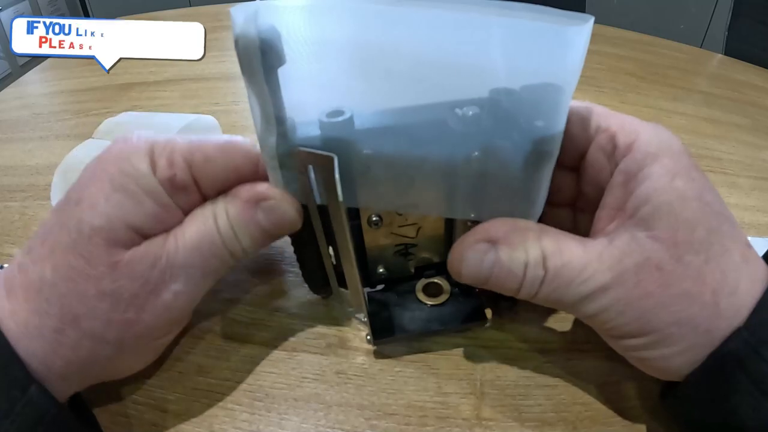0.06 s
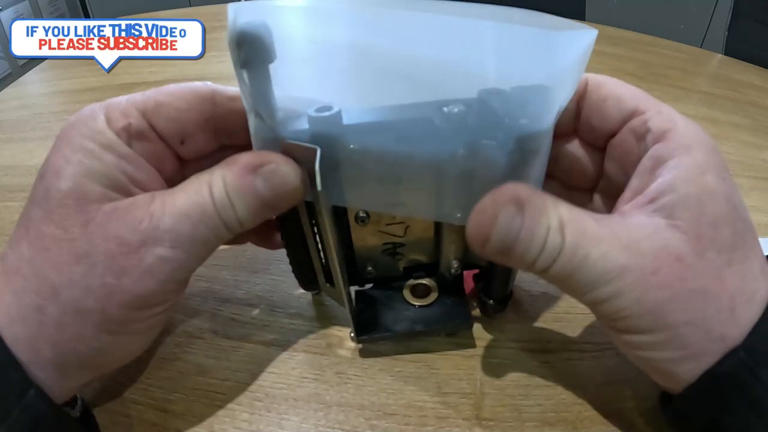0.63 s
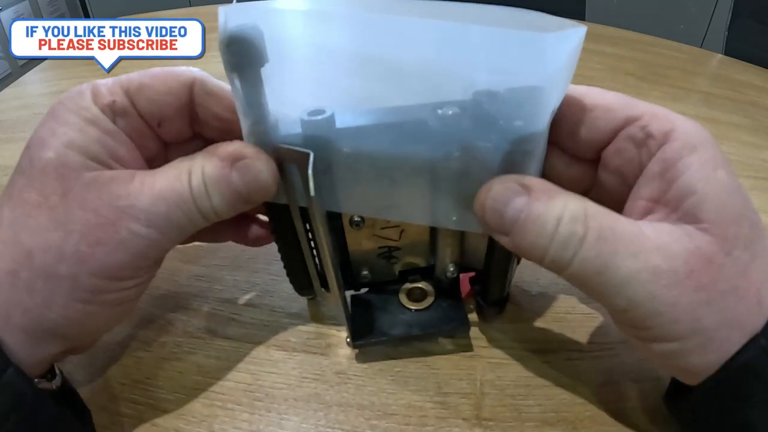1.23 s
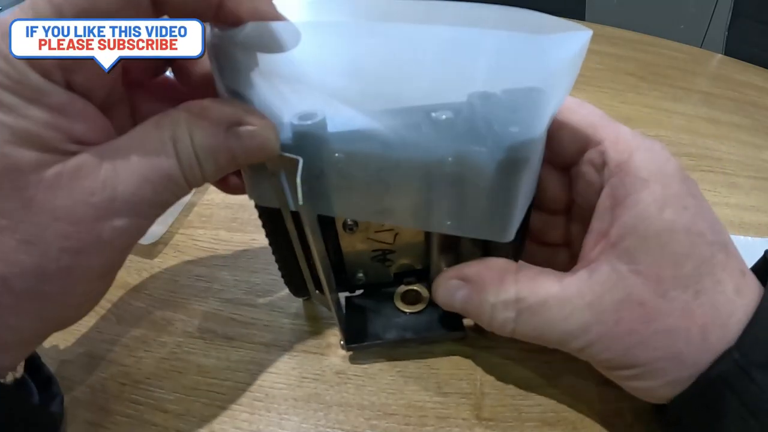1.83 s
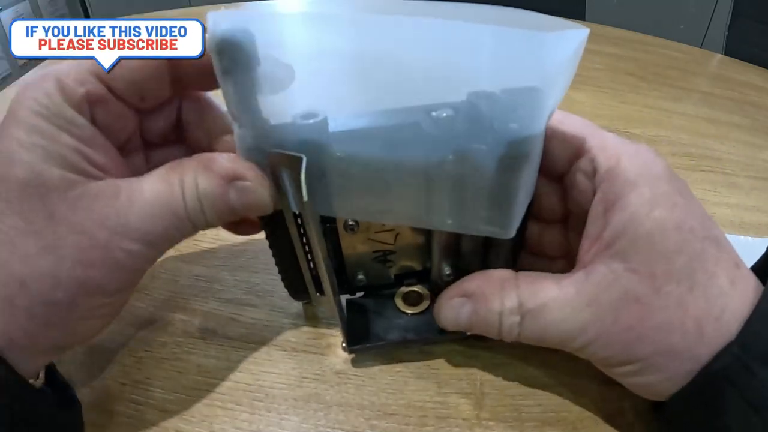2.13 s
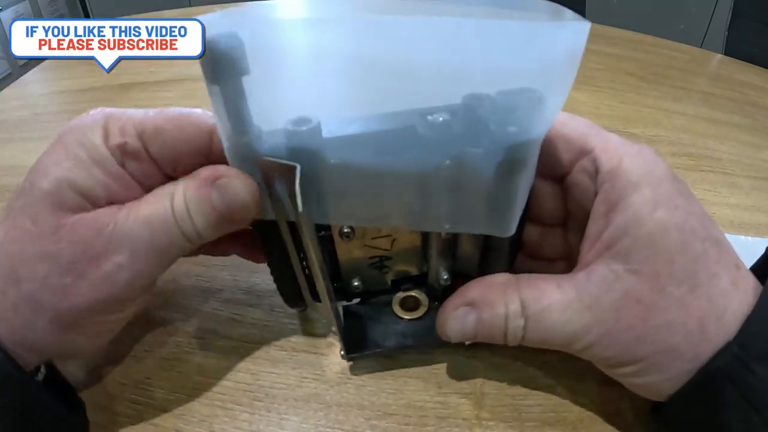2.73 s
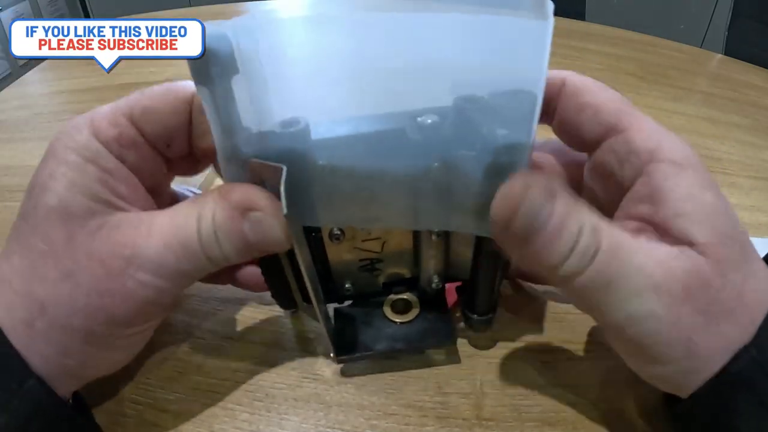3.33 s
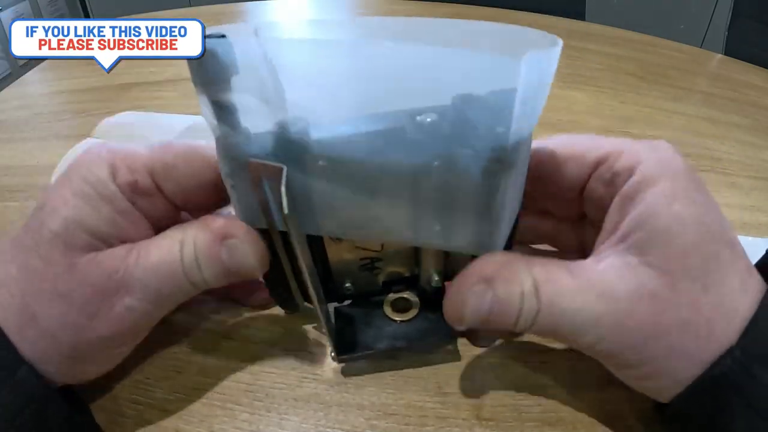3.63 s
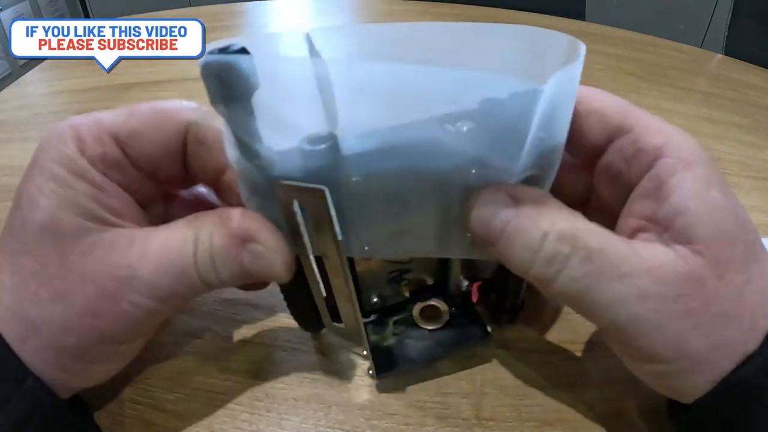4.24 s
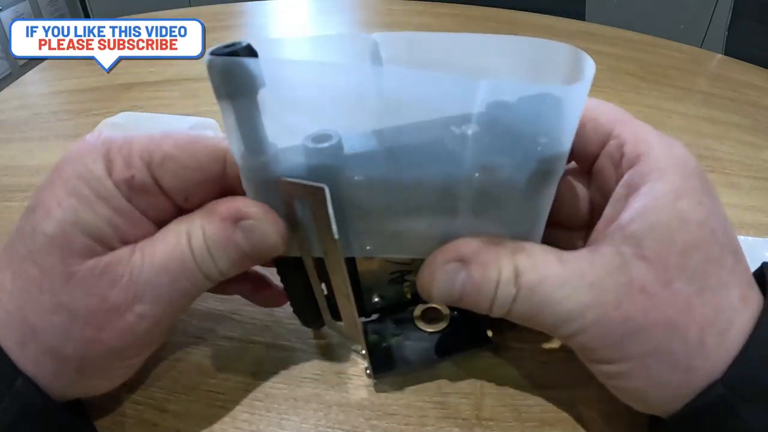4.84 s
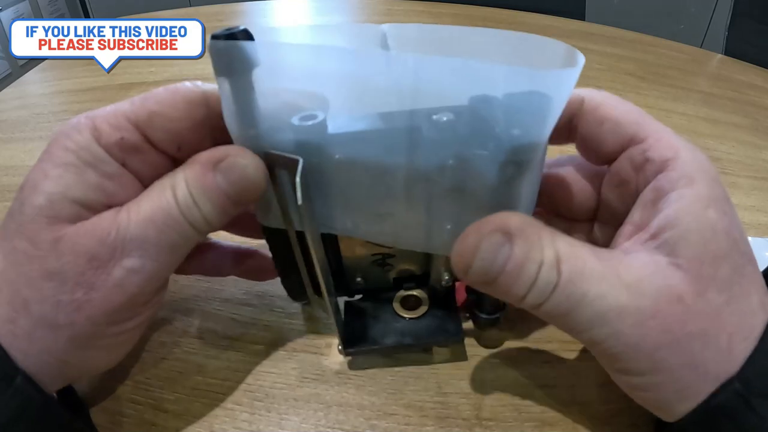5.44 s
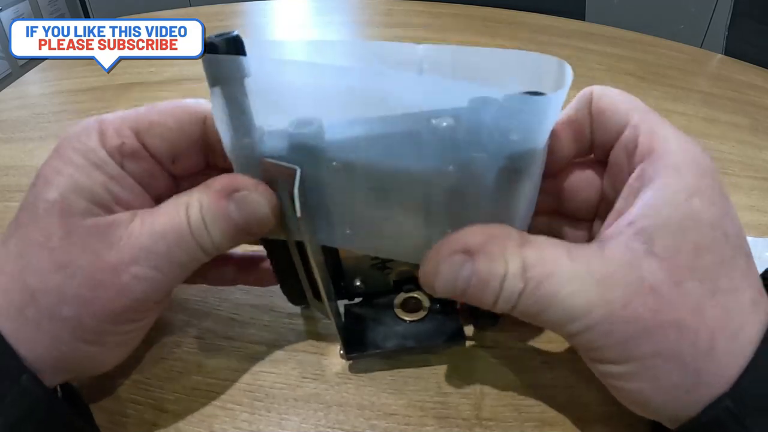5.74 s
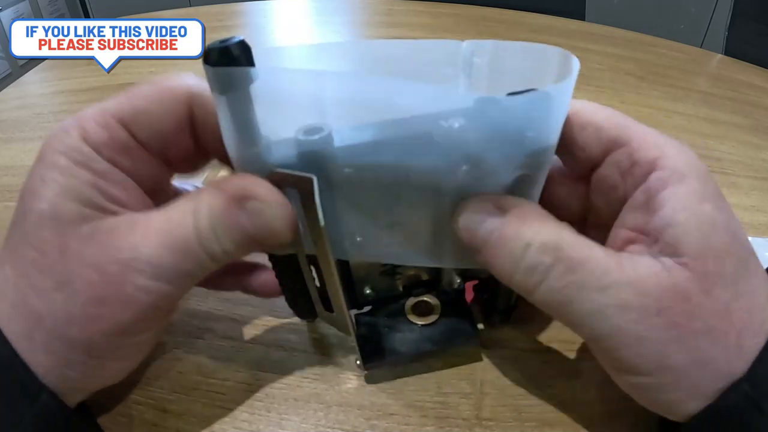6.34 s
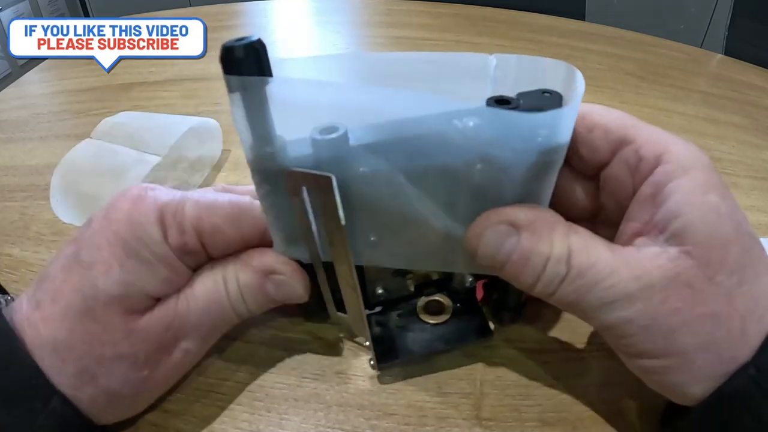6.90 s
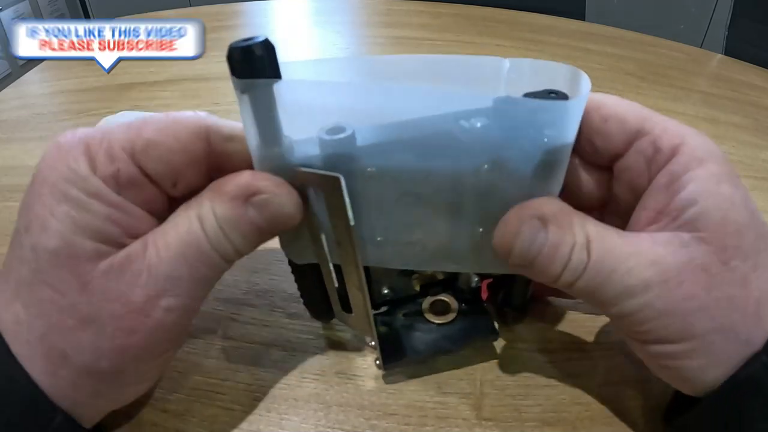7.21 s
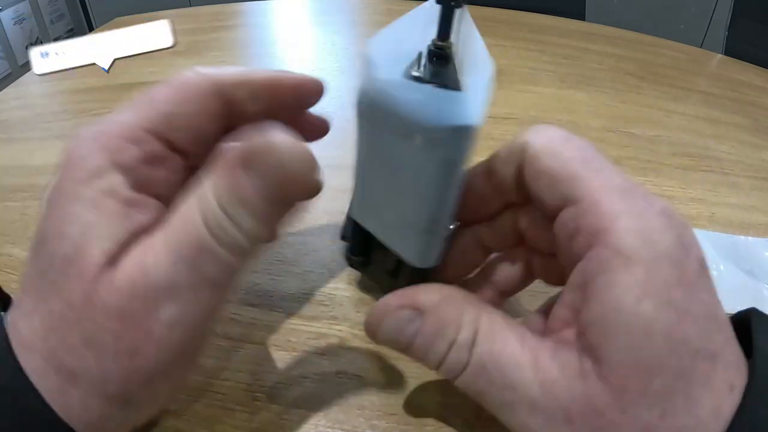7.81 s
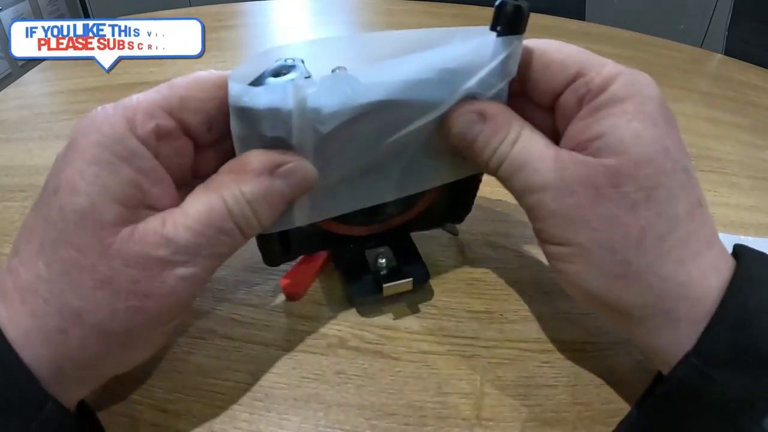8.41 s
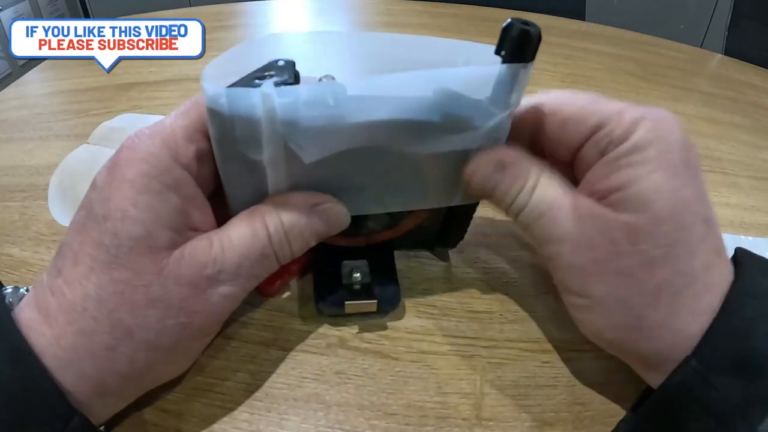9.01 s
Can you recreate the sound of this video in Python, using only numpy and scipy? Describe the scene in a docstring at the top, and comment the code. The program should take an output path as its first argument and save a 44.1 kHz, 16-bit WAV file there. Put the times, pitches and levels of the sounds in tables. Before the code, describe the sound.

Hands work a stiff plastic belt onto a small machine, with rubbing, snaps and hollow knocks on a wooden table, then a short juddering drag.

```python
"""Working a belt onto a small machine

Close stereo microphones in a small room: two hands work a stiff plastic belt down over the rollers
of a machine on a wooden table. The machine rocks and knocks on the wood, the belt snaps and scrapes
over its parts, and fingers rub on the plastic. Near the end the machine is set down and dragged round."""
import sys
import numpy as np
from scipy import signal
from scipy.fft import rfft, irfft, next_fast_len
from scipy.io import wavfile
from scipy.ndimage import uniform_filter1d

SR = 44100
rng = np.random.default_rng(int(sys.argv[2]) if len(sys.argv) > 2 else 0)


def dump_mix(stems):
    """Bounce the given channels to the path in sys.argv[1] as a 16-bit WAV at rate SR."""
    frames = np.atleast_2d(stems).T  # one column per channel
    limited = np.clip(frames, -1, 1)  # hard clip at full scale
    pcm = np.round(limited * 32767).astype(np.int16)
    wavfile.write(sys.argv[1], SR, pcm)


N = 399501

# The colours of snapping plastic, rubbed plastic, and the machine's feet on wood.
# Each row: frequency in Hz, relative level in dB.
SNAP_SPECTRUM = [(300, 20.5), (1500, 11), (4800, 6.5), (5500, -3.5), (6400, 2), (8000, 4), (15000, -26)]
HISS_SPECTRUM = [(2000, -1), (4000, -2), (7800, -0.5), (9000, -10), (11000, -15), (15000, -51)]
GRIND_SPECTRUM = [(200, -35), (560, 22), (900, 11.5), (1450, 11), (4000, -1), (5000, -0.5), (10000, -20),
                  (15000, -49)]


def knocks(ring_db=4.5, rise_s=0.00075, clack_db=-20, clack_t60=0.14):
    """The machine rocks onto the table: both ring hollowly, with a dull clack at the contact."""
    # Each row: start in seconds, level in dB, pitch of the thud in Hz.
    blows = [(0.376, -12.5, 271), (0.48, -18.5, 250), (0.548, -22, 290), (0.781, -30.5, 235),
             (0.869, -16.5, 216), (1.059, -26.5, 252), (1.156, -28, 197), (1.194, -24, 253),
             (1.471, -14.5, 235), (2.145, -28.5, 243), (2.505, -30.5, 241), (2.584, -22.5, 209),
             (2.926, -18, 217), (3.017, -19, 288.3), (3.296, -23, 217), (3.361, -17.5, 202),
             (3.473, -21.5, 234), (3.738, -26.5, 201), (4.103, -20.5, 314), (4.136, -13, 196),
             (4.231, -19, 224), (4.567, -20, 201), (4.672, -20.5, 217), (5.009, -19.5, 313.6),
             (5.028, -16.5, 196), (5.343, -11.5, 263), (5.524, -12, 248), (5.548, -14, 124),
             (5.951, -22, 260), (5.992, -11, 238), (6.059, -13, 218), (6.816, -24.5, 190),
             (6.996, -22, 226), (7.046, -21, 220), (7.209, -14, 216), (7.309, -24, 172), (7.373, -24, 234),
             (7.475, -18.5, 242), (7.541, -11, 226), (7.564, -13.5, 309), (7.583, -9.5, 297.6),
             (7.599, -15.5, 276), (7.776, -15.5, 233), (8.161, -15, 293), (8.432, -16, 244),
             (8.451, -14.5, 262), (8.591, -16, 302), (8.788, -21, 220), (8.86, -24, 220),
             (8.928, -20.5, 233)]
    out, t = np.zeros(N), np.arange(SR // 4) / SR
    give = 1 - np.exp(-t / rise_s)  # the table gives way over a millisecond or two
    for start, db, pitch_hz in blows:
        noise = rng.standard_normal(len(t))
        clack = unit_rms(filtered(noise, lambda hz: colour(GRIND_SPECTRUM, hz) * band(hz, 820, q=0.28)))
        clack *= give * amp(clack_db - 60 * t / clack_t60)
        add(out, start, amp(db) * give * (amp(ring_db) * table_ring(pitch_hz) + clack))
    return out


def table_ring(centre_hz, q=1.76, uneven_db=3):
    """A blow pushes machine and table opposite ways, favouring the modes near its own pitch."""
    # The machine's body, damped by the hands, and the table top, which rings on after it.
    # Each row: frequency in Hz, level in dB, time to fall 60 dB in seconds.
    machine_modes = [(200, -1.5, 0.065), (303.8, 4, 0.054), (402, -21.5, 0.22)]
    table_modes = [(98.3, -9.5, 0.14), (172, -13.5, 0.37), (254.3, -6, 0.17), (297.8, 0.5, 0.15),
                   (480, -23.5, 0.12), (573, -16.5, 0.1), (682, -16, 0.15), (955, -16, 0.097)]
    t = np.arange(SR // 4) / SR
    out = np.zeros(len(t))
    for direction, modes in (1, machine_modes), (-1, table_modes):
        for hz, db, t60 in modes:
            decay = amp(db + uneven_db * rng.uniform(-0.48, 1) - 60 * t / t60)
            out += direction * abs(band(hz, centre_hz, q)) * decay * np.sin(2 * np.pi * hz * t)
    return out


def bumps(hz=85, t60=0.12):
    """The whole table gives under the machine's weight: a deep, soft bump."""
    # Each row: start in seconds, level in dB.
    landings = [(5.135, -26), (5.538, -18.5), (5.98, -15), (7.585, -16), (8.06, -19)]
    out, t = np.zeros(N), np.arange(SR // 4) / SR
    rise = np.minimum(t * hz, 1)
    for start, db in landings:
        add(out, start, amp(db - 60 * t / t60) * rise * np.sin(2 * np.pi * hz * t))
    return out


def snaps(level_db=-4, rise_s=0.00067, crack_t60=0.015, tail_db=-20, tail_t60=0.033,
          bounce_s=0.006, bounce_db=-17):
    """The belt snaps and parts click: a crack coloured by the frame, a short ring and one bounce."""
    # Each row: start in seconds, level in dB, centre frequency in Hz.
    cracks = [(0.105, -28.5, 1050), (0.3495, -26.5, 1680), (0.377, -24, 2300), (0.449, -37.5, 6540),
              (0.4807, -19, 3550), (0.593, -37, 4210), (0.69, -34.5, 1450), (0.768, -35, 1440),
              (0.8729, -28.5, 1490), (1.472, -30.5, 1210), (1.956, -44, 6950), (2.1467, -23, 1820),
              (2.195, -40, 5000), (2.582, -28.5, 1060), (2.609, -31, 3400), (2.926, -28.5, 3400),
              (3.017, -21.5, 4230), (3.0625, -32.5, 3300), (3.252, -25.5, 1820), (3.296, -29, 3410),
              (3.602, -33, 6950), (3.936, -34, 1740), (4.422, -42.5, 6500), (4.6714, -39, 3240),
              (4.863, -33, 1140), (5.1383, -27, 1630), (5.5218, -19.5, 3940), (5.529, -27, 2000),
              (5.5495, -21, 1420), (5.9615, -19.5, 2180), (5.977, -22, 1570), (5.993, -29, 1520),
              (6.028, -30.5, 3840), (6.81, -29, 1660), (7.1997, -14, 2140), (7.467, -27, 1680),
              (7.5412, -17, 4060), (7.5655, -22, 1770), (7.585, -18.5, 2230), (7.602, -23, 2000),
              (7.616, -28, 2000), (8.0223, -17, 2748), (8.048, -23.5, 2640), (8.0695, -22.5, 2262),
              (8.1623, -20, 780), (8.431, -22.5, 4430), (8.446, -26.5, 1950), (8.5926, -19, 4380),
              (8.639, -33.5, 1960)]
    out, t = np.zeros(N), np.arange(SR // 8) / SR
    decay = amp(-60 * t / crack_t60) + amp(tail_db - 60 * t / tail_t60)
    envelope = (1 - np.exp(-t / rise_s)) * decay
    envelope += amp(bounce_db) * np.interp(t - bounce_s, t, envelope, left=0)
    for start, db, centre_hz in cracks:
        burst = rng.choice([-1, 1], len(t)) * envelope
        ring = filtered(burst, lambda hz: band(hz, centre_hz, q=1.4) + 3.5 * band(hz, centre_hz, q=6))
        crack = filtered(ring, lambda hz: colour(SNAP_SPECTRUM, hz) * (1 + 0.5 * frame(hz)))
        add(out, start, amp(db + level_db) * unit_burst(crack))
    return out


def frame(hz):
    """The response of the frame and belt, which ring at a few frequencies when struck or scraped."""
    # Each row: frequency in Hz, width in Hz, level in dB.
    frame_modes = [(1084, 41, 12.5), (1496, 70, 10), (2070, 32, 1), (2918, 78, 10), (3690, 100, 5.5),
                   (7480, 1000, 0.5)]
    return resonances(hz, frame_modes)


def chatter(pitch_hz=3610, q=5.6, rise_s=0.00052, t60=0.01, per_bounce_db=-2.5):
    """A loose plastic part bounces against the frame in bright clacks, each softer than the last."""
    # Each row: start in seconds, length in seconds, level in dB, seconds between bounces.
    rattles = [(0.481, 0.012, -27.5, 0.0064), (1.492, 0.022, -38.5, 0.0078), (3.016, 0.01, -27, 0.0055),
               (3.355, 0.025, -32, 0.01), (4.225, 0.022, -34.5, 0.0081), (4.572, 0.025, -31, 0.018),
               (5.005, 0.035, -29.5, 0.01), (7.568, 0.055, -26, 0.015)]
    out, t = np.zeros(N), np.arange(SR // 16) / SR
    envelope = (1 - np.exp(-t / rise_s)) * amp(-60 * t / t60)
    for start, length, db, gap in rattles:
        for bounce, delay in enumerate(np.arange(0, length, gap)):
            burst = rng.choice([-1, 1], len(t)) * envelope
            clack = filtered(burst, lambda hz: colour(SNAP_SPECTRUM, hz) * band(hz, pitch_hz, q) ** 2)
            add(out, start + delay, amp(db + per_bounce_db * bounce) * unit_burst(clack))
    return out


def drag(squeal_db=-22, grind_db=-30, shudder_db=-21, slow_hz=74.3, fast_hz=289.8):
    """The feet judder over the wood and drive the frame; the pitch falls as the machine slows."""
    # Two shoves, then slowing to rest. Each row: time in seconds, relative speed.
    shoves = [(7.635, 0.062), (7.755, 0.98), (7.79, 0.84), (7.85, 1.03), (7.928, 0.63), (8.03, 0.56),
              (8.16, 0.018)]
    # The frame rings as its feet scrape. Each row: frequency in Hz, width in Hz, level in dB.
    scrape_modes = [(2380, 45, -12), (3060, 81, -2.5), (3360, 46, -7.5), (3685, 160, -0.5), (3780, 89, -13)]
    speed = np.interp(np.arange(N) / SR, *np.transpose(shoves), left=0, right=0)
    pitch_hz = slow_hz + (fast_hz - slow_hz) * speed
    grains = friction(per_s=2200, spread_db=1, clump_db=2.2, clump_s=0.005)
    jerks = blend(judder(pitch_hz), grains, regular_share=0.15)
    squeal = filtered(jerks, lambda hz: resonances(hz, scrape_modes) / (1 + (hz / 3950) ** 20))
    squeal += 0.021 * coloured(jerks, HISS_SPECTRUM)
    grind = coloured(jerks, GRIND_SPECTRUM)
    shudder = resonate(resonate(grains, pitch_hz, width_hz=150), pitch_hz, width_hz=150)
    return (amp(squeal_db) * speed ** 4.6 * unit_rms(squeal)  # squeals only near top speed
            + amp(grind_db) * speed ** 0.98 * unit_rms(grind)
            + amp(shudder_db) * speed ** 0.52 * unit_rms(shudder))


def rubbing(rumble_db=-23, sway_db=4, sway_hz=12.4):
    """Fingers creep over the belt: a grainy rub that rings it, a fine hiss and a rumble in the table."""
    # Skin on plastic. Each row: frequency in Hz, relative level in dB.
    finger_spectrum = [(300, 22.5), (550, 9), (1450, -13), (2100, 2.5), (4300, -5), (5500, -33),
                       (9000, -28.5)]
    # The taut belt's resonances. Each row: frequency in Hz, width in Hz, level in dB.
    belt_modes = [(1109, 72, 9.5), (1463, 164, 14), (2878, 133, 11), (3560, 63, 7), (3990, 41, 4)]
    rub_gain, hiss_gain = finger_pressure()
    grains = friction(per_s=5000, spread_db=2.8, clump_db=1.6, clump_s=0.014)
    belt = np.zeros(N)
    for mode in belt_modes:  # as the grip shifts, each swells and fades on its own
        ring = filtered(grains, lambda hz: resonances(hz, [mode]) / (1 + (hz / 5000) ** 4))
        belt += ring * amp(sway_db * drift(sway_hz))
    rub = unit_rms(coloured(grains, finger_spectrum) + 1.12 * belt)
    # echoes inside the loop of the belt give the hiss a hollow, rippled colour
    echoes = rng.standard_normal(192)
    hollow = grains + signal.oaconvolve(grains, echoes / np.linalg.norm(echoes))[:N]
    hiss = unit_rms(coloured(hollow, HISS_SPECTRUM))
    rumble = unit_rms(signal.oaconvolve(grains, table_ring(centre_hz=212, q=2.9))[:N])
    return rub_gain * rub + hiss_gain * hiss + amp(rumble_db) * np.sqrt(rub_gain) * rumble


def finger_pressure(attack_s=0.02, release_s=0.067, build_db=5,
                    grip_rub_db=-52.5, grip_hiss_db=-64, sway_db=4, rest_db=-9):
    """Gains of the rub and the hiss: strokes that press ever harder, over the slight creep of the grip."""
    # Each row: start in seconds, length in seconds, rub level in dB, hiss level in dB.
    strokes = [(0.0, 0.17, -40.5, -54), (0.386, 0.18, -35, -53.5), (0.614, 0.059, -48, -50.5),
               (0.912, 0.12, -45.5, -57), (1.411, 0.036, -50, -59), (1.781, 0.029, -41, -55),
               (1.931, 0.036, -45, -50.5), (2.112, 0.042, -38.5, -51.5), (2.285, 0.065, -45, -79),
               (2.559, 0.025, -32.5, -68), (2.659, 0.055, -46.5, -52), (2.994, 0.17, -41, -48.5),
               (3.297, 0.29, -50, -54.5), (3.535, 0.063, -36, -50), (3.616, 0.13, -42, -54.5),
               (3.87, 0.31, -43.5, -57), (4.08, 0.15, -43, -57), (4.34, 0.09, -41, -59),
               (4.54, 0.07, -34.5, -64), (4.726, 0.2, -44, -54.5), (4.952, 0.23, -42, -58),
               (5.293, 0.085, -35, -48), (5.453, 0.061, -33.5, -75), (5.745, 0.079, -37, -46.5),
               (5.892, 0.095, -31.5, -56), (6.11, 0.089, -42.5, -52), (6.435, 0.088, -42, -50.5),
               (6.554, 0.062, -38.5, -47.5), (6.776, 0.019, -34, -44.5), (6.908, 0.083, -36.5, -46),
               (7.018, 0.22, -50, -54), (7.273, 0.14, -39, -53.5), (8.127, 0.097, -41, -62.5),
               (8.365, 0.064, -36.5, -49.5), (8.755, 0.025, -44, -63), (8.897, 0.034, -36, -49)]
    # The hands lie almost still. Each row: start and end in seconds.
    rests = [(0.25, 0.28), (2.21, 2.29), (2.379, 2.49)]
    now = np.arange(N) / SR
    resting = sum(1.0 * ((now > start) & (now < end)) for start, end in rests)
    creep_db = sway_db * drift(rate_hz=13.5) + rest_db * uniform_filter1d(resting, size=1024)
    rub_power, hiss_power = amp(grip_rub_db + creep_db) ** 2, amp(grip_hiss_db + creep_db) ** 2
    for start, length, rub_db, hiss_db in strokes:
        t = np.arange(0, length + release_s, 1 / SR)
        take_hold = np.minimum(t / attack_s, 1)
        press = amp(build_db * (np.minimum(t / length, 1) - 1))
        let_go = np.minimum(1 - (t - length) / release_s, 1) ** 2
        envelope = take_hold * press * let_go
        add(rub_power, start, (amp(rub_db) * envelope) ** 2)
        add(hiss_power, start, (amp(hiss_db) * envelope) ** 2)
    return np.sqrt(rub_power), np.sqrt(hiss_power)


def scrapes():
    """The machine's feet scrape the wood and the belt slips on the frame: short rasps; sharp ones squeak."""
    # Each row: start in seconds, length in seconds, level in dB, centre in Hz, sharpness as Q.
    rasps = [(0.789, 0.079, -54.5, 3200, 5.5), (1.156, 0.1, -55, 3540, 2), (2.501, 0.034, -47.5, 3060, 3.8),
             (4.093, 0.065, -39.5, 1300, 1.2), (4.099, 0.079, -40, 4100, 2.3),
             (4.331, 0.065, -49.5, 2900, 1.8), (4.663, 0.026, -47, 3180, 1.7),
             (5.304, 0.09, -41.5, 2970, 3.2), (5.354, 0.069, -34.5, 3200, 3.3),
             (5.924, 0.038, -48, 3600, 3.3), (6.043, 0.04, -36.5, 3300, 4), (7.96, 0.021, -36.5, 3640, 6.9)]
    jerks = judder(pitch_hz=232)
    grains = friction(per_s=6300, spread_db=2, clump_db=1, clump_s=0.0063)
    scrape = blend(jerks, grains, regular_share=0.4)
    out = np.zeros(N)
    for start, length, db, centre_hz, q in rasps:
        stroke = swell(scrape, start, length, taper=0.7)
        stroke = np.pad(stroke, (0, len(stroke)))  # time to ring out
        rasp = filtered(stroke, lambda hz: colour(SNAP_SPECTRUM, hz) * (0.88 + frame(hz))
                        * (0.093 + abs(band(hz, centre_hz, q)) ** 2))
        add(out, start, amp(db) * unit_rms(rasp))
    return out


def swishes(low_hz=3900, high_hz=6600):
    """Skin glides lightly along the smooth belt: a soft hiss that swells and fades."""
    # Each row: start in seconds, length in seconds, level in dB.
    glides = [(0.0, 0.082, -49), (1.615, 0.52, -60.5), (8.268, 0.47, -56.5)]
    out, noise = np.zeros(N), rng.standard_normal(N)
    hiss = filtered(noise, lambda hz: hz ** 2 / (hz ** 2 + low_hz ** 2) / (1 + (hz / high_hz) ** 20))
    hiss = unit_rms(hiss)
    for start, length, db in glides:
        add(out, start, amp(db) * swell(hiss, start, length, taper=0.8))
    return out


def friction(per_s, spread_db, clump_db, clump_s):
    """Irregular stick and slip: tiny impulses of uneven size that come in clumps."""
    size = amp(spread_db * np.minimum(rng.exponential(1, N), 4)) * rng.standard_normal(N)
    knots = np.arange(0, N / SR + 1, clump_s)
    clumps = np.interp(np.arange(N) / SR, knots, rng.standard_normal(8192)[:len(knots)])
    slipping = rng.random(N) < per_s / SR
    return size * slipping * amp(clump_db * clumps)


def judder(pitch_hz, waver=0.02, waver_hz=45, uneven_db=3.5):
    """A contact sticks and lets go once a cycle: a train of uneven jerks."""
    rate_hz = pitch_hz * (1 + waver * drift(waver_hz))
    cycles = np.floor(np.cumsum(rate_hz) / SR)
    size = amp(uneven_db * rng.uniform(-0.88, 1, N))
    return np.diff(cycles, prepend=0) * unit_rms(size) * np.sqrt(SR / pitch_hz)


def room_echo(x, delay_s=0.007):
    """The small room's diffuse tail, each band dying at its own speed."""
    # Each row: frequency in Hz, time to fall 60 dB in seconds.
    decay_times = [(300, 0.33), (4000, 0.15), (10000, 0.23)]
    hz, t, bands = signal.stft(rng.standard_normal(SR // 2), SR, nperseg=256)
    decay = amp(-60 * t / curve_at(decay_times, hz)[:, None])
    _, tail = signal.istft(bands * decay, SR, nperseg=256)
    tail = np.pad(tail / np.linalg.norm(tail), (round(delay_s * SR), 0))
    return signal.oaconvolve(x, tail)[:N]


def room_tone(level_db=-52):
    """The steady low murmur of the room's air."""
    # Each row: frequency in Hz, relative level in dB.
    air_spectrum = [(12, -53), (20, -17), (103, -18), (242, 1), (841, -36), (1460, -30), (1880, -30),
                    (7720, -42), (15000, -78)]
    return amp(level_db) * unit_rms(coloured(rng.standard_normal(N), air_spectrum))


def microphones(x, reflected=0.71, delay_s=0.003, diffuse=0.22, balance_db=-0.82):
    """A close pair: a reflection off the table and the room's echoes reach the two unequally."""
    # Each row: frequency in Hz, gain of the side signal in dB.
    side_spectrum = [(250, -17.5), (1000, -7.5), (8000, -8), (12000, -2)]
    reflection = np.pad(x, (round(delay_s * SR), 0))[:N]
    side = coloured(reflected * reflection + diffuse * room_echo(x), side_spectrum)
    return np.array([(x + side) * amp(balance_db / 2), (x - side) * amp(-balance_db / 2)])


def amp(db):
    """Decibels to gain."""
    return 10 ** (np.asarray(db) / 20)


def unit_rms(x):
    """Scales to rms 1."""
    return x / np.sqrt(np.mean(x ** 2) + 1e-20)


def unit_burst(x):
    """Scales the loudest 3 ms to rms 1."""
    return x / np.sqrt(uniform_filter1d(x ** 2, size=128).max())


def add(mix, start, sound):
    """Mixes a sound in at a start time in seconds."""
    part = mix[round(start * SR):][:len(sound)]
    part += sound[:len(part)]


def blend(jerks, grains, regular_share):
    """Mixes regular jerks and irregular grains by their shares of the power."""
    return np.sqrt(regular_share) * jerks + np.sqrt(1 - regular_share) * unit_rms(grains)


def swell(x, start, length, taper):
    """A stretch of x, faded in and out."""
    part = x[round(start * SR):][:round(length * SR)]
    return part * signal.windows.tukey(len(part), taper)


def drift(rate_hz):
    """A slow random wander of rms 1."""
    return unit_rms(filtered(rng.standard_normal(N), lambda hz: np.exp(-(hz / rate_hz) ** 2)))


def filtered(x, gain):
    """Filters x by a gain that is a function of frequency."""
    size = next_fast_len(len(x) + 4096)
    hz = np.fft.rfftfreq(size, 1 / SR)
    return irfft(rfft(x, size) * gain(hz), size)[:len(x)]


def curve_at(points, hz):
    """Interpolates a table on a log-frequency axis."""
    points_hz, values = np.transpose(points)
    return np.interp(np.log(hz + 1), np.log(points_hz + 1), values)


def colour(spectrum, hz):
    """The gain of a spectrum table at hz."""
    return amp(curve_at(spectrum, hz))


def coloured(x, spectrum):
    """Filters x by a spectrum table."""
    return filtered(x, lambda hz: colour(spectrum, hz))


def band(hz, centre_hz, q):
    """The response of one resonance: each contact favours one region."""
    return 1 / (1 + 1j * q * (hz / centre_hz - centre_hz / (hz + 1)))


def resonances(hz, modes):
    """The summed response of a table of resonances."""
    return sum(amp(db) / (1 + 2j * (hz - centre_hz) / width_hz) for centre_hz, width_hz, db in modes)


def resonate(x, hz, width_hz):
    """Passes x through a resonance that follows the curve hz."""
    turn = np.exp(2j * np.pi * np.cumsum(hz) / SR)
    pole = np.exp(-np.pi * width_hz / SR)
    return (turn * signal.lfilter([1 - pole], [1, -pole], x / turn)).real


def scene(thud_echo_db=-10, plastic_echo_db=-11):
    """All the handling, its echo and the room's own tone, as they reach the microphones."""
    thuds = knocks() + bumps()
    plastic = snaps() + chatter() + swishes() + rubbing() + scrapes() + drag()
    echo = room_echo(amp(thud_echo_db) * thuds + amp(plastic_echo_db) * plastic)
    return microphones(thuds + plastic + echo + room_tone())


def record(dry, low_cut_hz=15, high_cut_hz=15050):
    """The recorder's gentle low cut and steep band limit."""
    low_cut = signal.butter(1, low_cut_hz, "highpass", fs=SR, output="sos")
    high_cut = signal.firwin(511, high_cut_hz, window=("kaiser", 9), fs=SR)
    return signal.oaconvolve(signal.sosfilt(low_cut, dry), high_cut[None], "same")


dry = scene()
out = record(dry)
dump_mix(out)
```